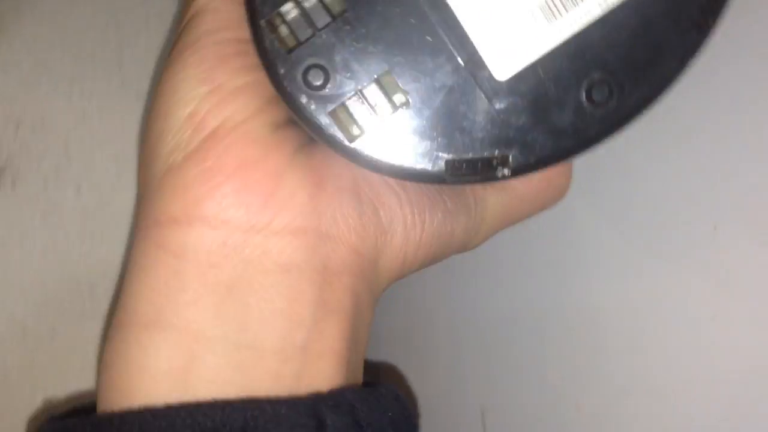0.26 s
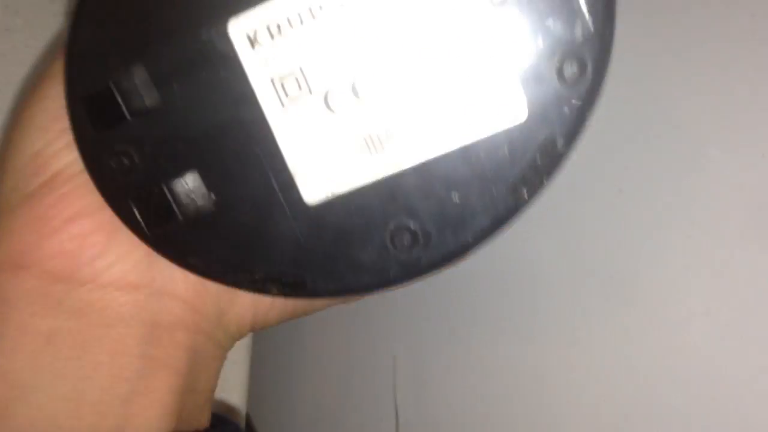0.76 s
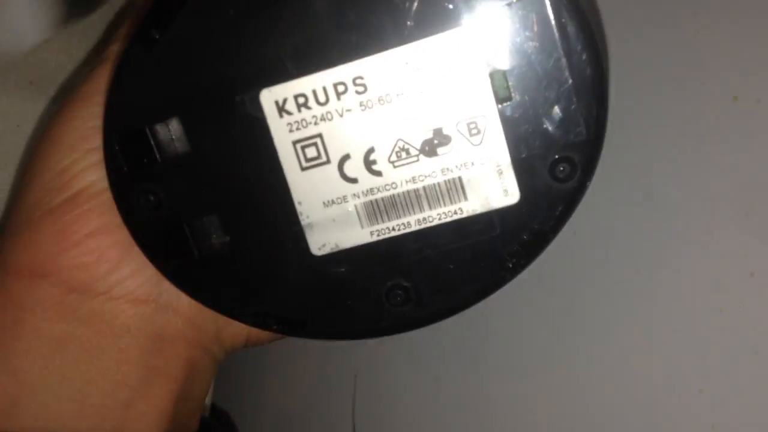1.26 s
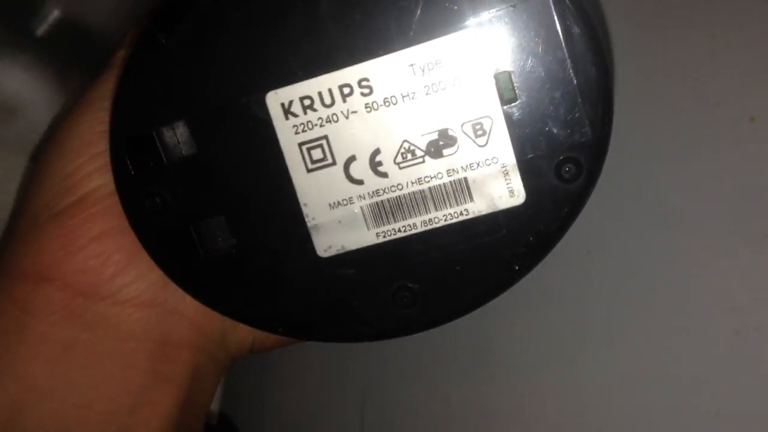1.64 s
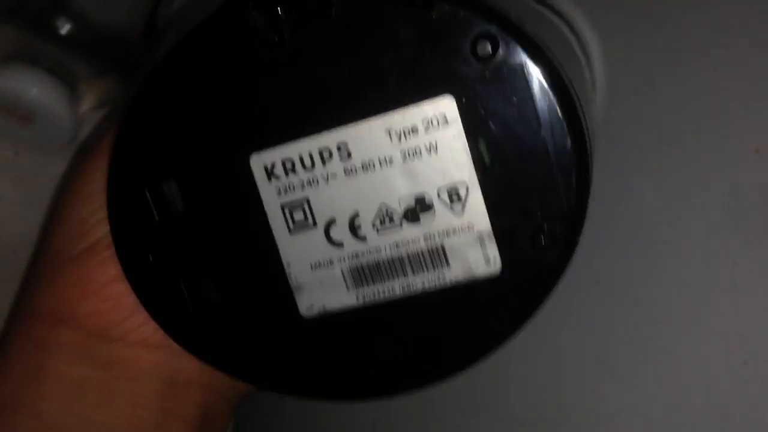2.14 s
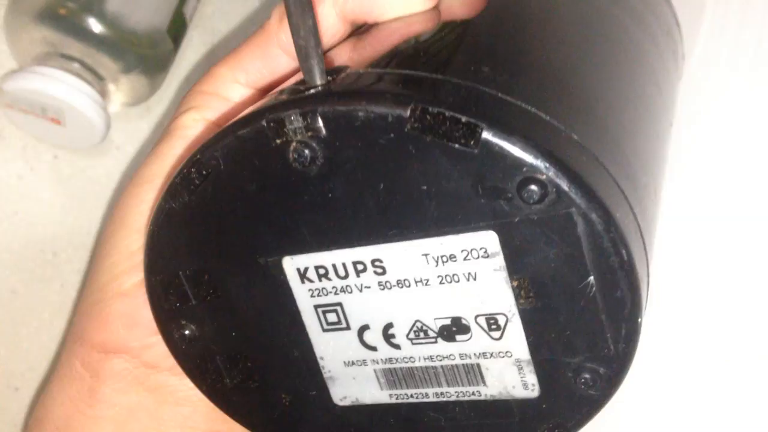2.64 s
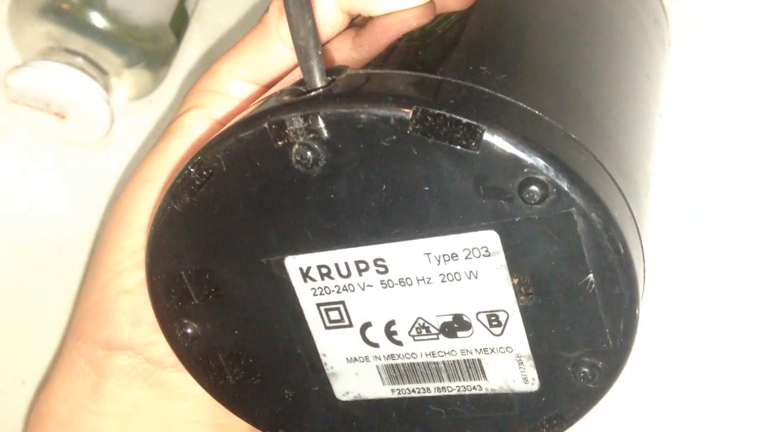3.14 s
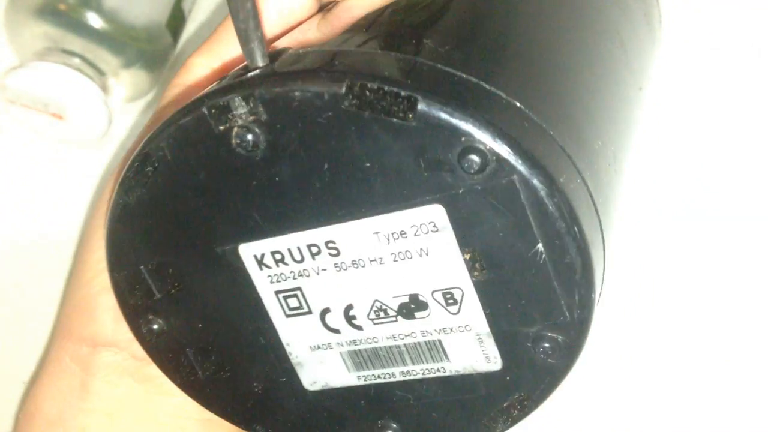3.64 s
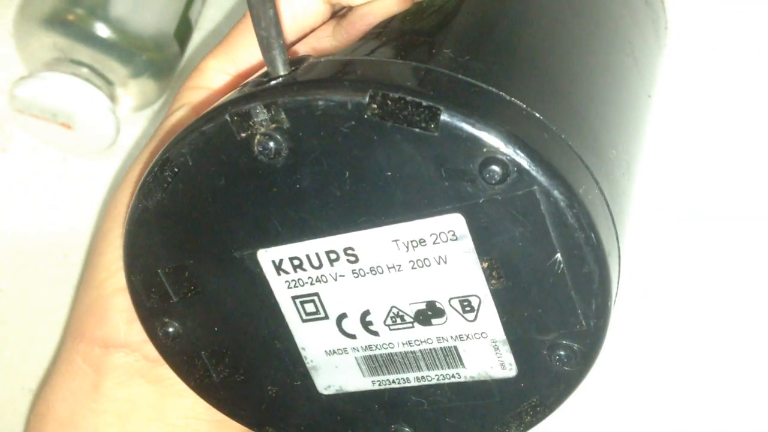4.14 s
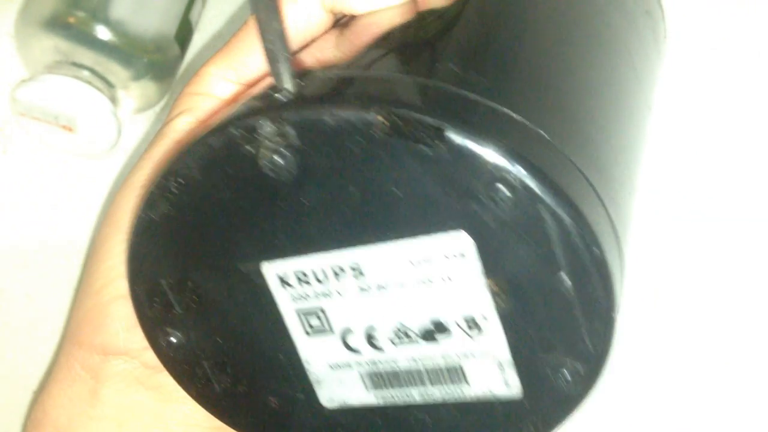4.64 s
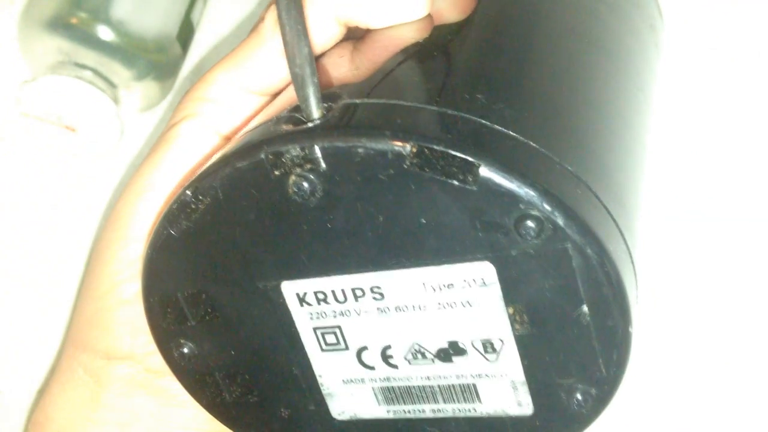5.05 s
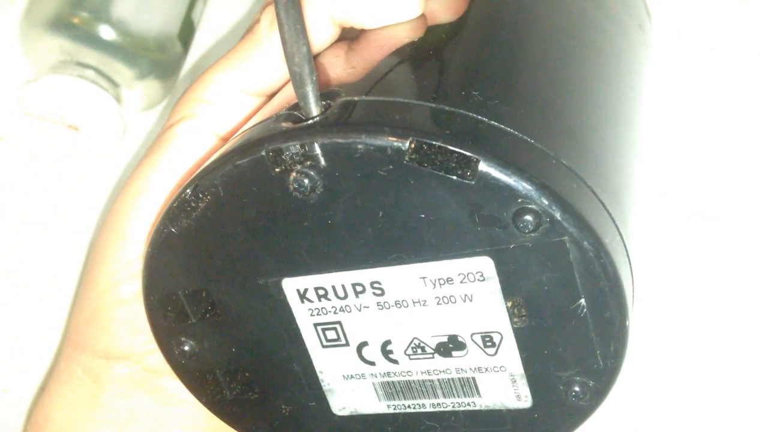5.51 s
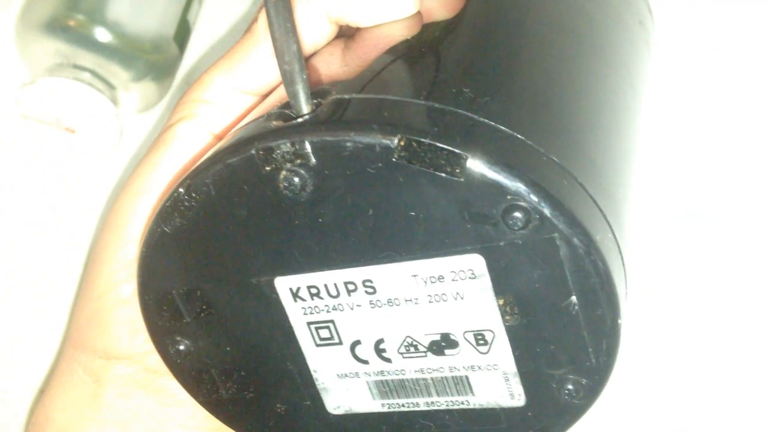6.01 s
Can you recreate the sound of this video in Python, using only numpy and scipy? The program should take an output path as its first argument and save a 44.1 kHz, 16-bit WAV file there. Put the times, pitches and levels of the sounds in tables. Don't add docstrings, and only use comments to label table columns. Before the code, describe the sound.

A quiet kitchen with low hum and soft air, heard very close through one phone microphone. From 0 to 0.4 s, faint finger taps and skin rustle on plastic, then near stillness. The grip tightens around 1.2 s and a loose lid knocks hard on a hollow plastic housing, irregular bright clacks with scuffs and low rumble until 2.2 s; lighter, more muffled chatter follows as it is turned over, ending about 2.55 s. Only room hush until 3.49 s, when a loud double snap of the button starts an empty electric motor. It leaps up in pitch, then climbs slower, a piercing whine with rough whirr, mains pulsing and airy hiss; a small finger click at 4.37 s. Power stops at 4.7 s and the pitch glides steadily down. At 5.13 s the lid springs up with a faint click, the sound thins and buzzes around 5.7 s, still slowing at the end, 6.3 s.

```python
import sys
import numpy as np
from scipy import signal
from scipy.fft import rfft, irfft, next_fast_len
from scipy.io import wavfile
from scipy.ndimage import uniform_filter1d, map_coordinates

SR = 44100
rng = np.random.default_rng(int(sys.argv[2]) if len(sys.argv) > 2 else 0)


def wav_out(sig):
    wavfile.write(sys.argv[1], SR, np.round(np.clip(np.atleast_2d(sig).T, -1, 1) * 32767).astype(np.int16))


def boost(x):
    u = np.asarray(x, float) / 20
    return 10 ** u


N = 276948
T = np.arange(N) / SR

ON_S, OFF_S = 3.484, 4.686
LET_GO_S = 5.135
MAINS_HZ = 100
TOP_HZ = 15400

# centre in Hz, width in Hz, level in dB.
THUMP = [(148.5, 28.6, 0)]
# centre in Hz, width in Hz, level in dB.
HOLLOW = [(332, 57, 1), (540, 70, -3), (795, 114, -5.5)]
# centre in Hz, width in Hz, level in dB.
RING = [(1193, 187, -10), (1349, 167, -8), (1488.6, 27.3, -2), (1786, 112, -14)]
# centre in Hz, width in Hz, level in dB.
SHELL = [(2336, 138, 4), (3130, 85, -2.5), (3390, 140, -9), (4174, 180, -8)]


def unit(x):
    return x / np.sqrt(np.mean(x ** 2) + 1e-20)


def peak(x):
    return x / np.abs(x).max()


def along(points, hz):
    f, v = np.transpose(points)
    return np.interp(np.log(hz + 1), np.log(f + 1), v)


def curve(points, silent=-120):
    s, db = np.transpose(points)
    return np.interp(T, s, db, silent, silent)


def wobble(rate):
    at = np.arange(0, N + 32, 32)
    knots = rng.standard_normal(int(N * rate / SR) + 4)
    return np.interp(np.arange(N), at, map_coordinates(knots, [at * rate / SR]))


def filtered(x, response):
    m = next_fast_len(len(x) + 8192)
    return irfft(rfft(x, m) * response(np.fft.rfftfreq(m, 1 / SR)), m)[:len(x)]


def noise(spectrum):
    return filtered(rng.standard_normal(N), lambda hz: boost(along(spectrum, hz)))


def resonance(hz, centre, width):
    return 1j * hz * width / (centre * centre - hz * hz + 1j * hz * width)


def bump(x, centre, width):
    return 1 / (1 + (2 * (x - centre) / width) ** 2)


def modes(table, scatter_db=0):
    gains = boost(np.transpose(table)[2] + scatter_db * rng.standard_normal(len(table)))

    def response(hz):
        total = 0
        for k, ((centre, width, _), gain) in enumerate(zip(table, gains)):
            total = total + (-1) ** k * gain * resonance(hz, centre, width)
        return total
    return response


def hush():
    # Hz, level in dB per Hz.
    room_spectrum = [(12, -63), (20, -17.5), (78, -10.5), (106, -0.5), (140, 0.5), (342, -14), (439, -17.5),
                     (478, -18), (705, -23), (1230, -23.5), (1540, -22.5), (2270, -25), (2610, -33),
                     (14300, -40.5), (15500, -42.5)]
    # time in seconds, level in dB.
    room_level = [
        (0.0, -51),
        (6.28, -55),
    ]
    return boost(curve(room_level, silent=None) + wobble(4.1)) * unit(noise(room_spectrum))


def kitchen_echo(x):
    # Hz, decay by 60 dB in seconds.
    walls = [(150, .3), (2000, 0.19), (10000, 0.16)]
    hz, t, z = signal.stft(rng.standard_normal(SR // 2), SR, nperseg=256)
    decay = boost(-60 * t / along(walls, hz)[:, None])
    tail = signal.istft(z * decay, SR, nperseg=256)[1]
    late = np.pad(x, (200, 0))
    return signal.fftconvolve(late, tail / np.linalg.norm(tail))[:N]


def shaking():
    # time in seconds, effort of the shake in dB.
    effort = [
        (1.1, -75),
        (1.238, -57),
        (1.298, -37),
        (1.43, -47),
        (1.75, -41),
        (2.05, -41),
        (2.244, -45),
        (2.37, -35.5),
        (2.5, -54),
        (2.65, -74),
    ]
    # time in seconds, level in dB.
    rustle = [
        (0.0, -52.5),
        (0.06, -49),
        (0.3, -68.5),
        (0.92, -59),
        (1.1, -63),
        (1.2, -51.5),
        (1.245, -49),
    ]
    effort_db = curve(effort)
    scuff_db = 1.3 * (effort_db + 42.5) - 41

    slips = boost(4.5 * wobble(90)) * rng.standard_normal(N)
    scuff = 1.2 * unit(filtered(slips, modes(np.array(RING) * [1, 2.5, 1])))
    scuff += 0.35 * unit(filtered(slips, modes(SHELL)))
    scuff += 0.8 * unit(filtered(slips, modes(HOLLOW)))
    scuff = unit(scuff + 0.025 * slips)

    rumble = unit(boost(3.2 * wobble(30.1)) * filtered(rng.standard_normal(N), modes(THUMP)))
    skin_spectrum = [(150, -21), (350, 12.0), (1500, -6), (5000, -13), (14000, -21)]  # (Hz, dB)
    skin = unit(boost(3.9 * wobble(35)) * noise(skin_spectrum))
    return boost(effort_db - 0.3) * rumble + boost(scuff_db - 1.5) * scuff + boost(curve(rustle) - 2.0) * skin


def button():
    # start in seconds, peak in dB, low push in dB, length
    # in seconds.
    clicks = [
        (0.029, -43, 9, 0.015),
        (0.064, -41, 8, 0.0055),
        (0.2, -38.5, 4.5, 0.0088),
        (0.409, -42, -9, .005),
        (3.487, -12.5, -7.5, 0.0075),
        (3.494, -14.5, 3, 0.014),
        (3.513, -19.5, -14.5, 0.0043),
        (4.27, -35, -29, 0.013),
        (4.365, -27, -5.5, .015),
              (5.126, -30, 5, .012),
    ]
    out, t = np.zeros(N + SR), np.arange(SR // 10) / SR
    for s, db, low_db, length in clicks:
        burst = boost(-25 * t / length) * rng.standard_normal(len(t))
        snap = filtered(burst, modes([(1880, 2700, 5.0), (4670, 3000, -0.5), (9000, 13000, -12.0)]))
        push = filtered(burst, modes([(316, 270, 9.5), (650, 1300, 2)]))
        out[round(s * SR):][:len(t)] += boost(db) * (peak(snap) + boost(low_db) * peak(push))
    return out[:N]


def blow(t, t60):
    burst = boost(-60 * t / t60) * rng.standard_normal(len(t))
    burst[:2] = 1.66
    late = rng.integers(130, 300)
    burst[late:] += rng.uniform(0.13, 0.64) * burst[:-late]
    return burst


def knock(t, db, flat_db, ring_db, damping):
    # Hz, level in dB.
    crack_spectrum = [(3000, 0), (5600, 3.5), (8800, -1), (12000, -9), (15500, -30)]
    thump_db = -0.5 + 1.05 * flat_db
    hollow_db = 1.54 + 0.86 * flat_db
    crack_db = 0.6 + 0.96 * flat_db + 0.28 * (db + 14.5)

    thump = peak(filtered(blow(t, 0.016), lambda hz: modes(THUMP)(hz) / (1 + 1j * hz / 300)))
    hollow = peak(filtered(blow(t, 0.016), modes(HOLLOW, scatter_db=1.5)))
    cup = modes(np.array(RING) * [1, damping, 1], scatter_db=0.5)
    ring = peak(filtered(blow(t, 0.011), lambda hz: cup(hz) * (1j * hz / (1100 + 1j * hz)) ** 2))
    shell = peak(filtered(blow(t, 0.0078), modes(SHELL, scatter_db=1.6)))
    settle = blow(t, 0.017) + boost(-17.5 + 0.4 * flat_db) * blow(t, 0.07)
    crack = peak(filtered(settle, lambda hz: boost(along(crack_spectrum, hz)) * (hz > 2900)))

    body = shell + boost(thump_db + 8.0) * thump + boost(hollow_db + 6.5) * hollow
    return boost(db) * (body + boost(ring_db + 5.5) * ring + boost(crack_db + 7.5) * crack)


def lid():
    # start in seconds, peak in dB, flatness in dB, ring in dB.
    knocks = [(1.2181, -51, 8, -3.5), (1.2479, -25, -3, -4), (1.3041, -6.5, -14.5, -4),
              (1.4122, -15.5, -9, 7), (1.502, -11.5, -18, -3), (1.5417, -23, -0.5, 7),
              (1.576, -9.5, -20, -6), (1.6513, -12.5, -16.5, -3), (1.719, -14, -15.5, -7.5),
              (1.7444, -22, 0, 4), (1.7707, -11.5, -22, -7.5), (1.8252, -12.5, -21, -4),
              (1.8716, -16.5, -17.5, -7), (1.9163, -15, -10, -5), (1.99, -8, -21.5, -11.5),
              (2.0515, -14, -11.5, -4.5), (2.094, -18.5, -20, -8), (2.1261, -19.5, -17, -11),
              (2.154, -26, -14.5, -6), (2.171, -25, -4, -1), (2.2174, -13.5, -20.5, -4)]
    # start in seconds, peak in dB, flatness in dB.
    chatter = [(2.2576, -28, -4.5), (2.2699, -19, -20.5), (2.293, -24.5, -15), (2.316, -26.5, -14),
               (2.3283, -27.5, -7.5), (2.3612, -17, -22), (2.379, -30, -16), (2.397, -18.5, -21),
               (2.416, -34.5, -8), (2.4571, -20.5, -16.5), (2.483, -30.5, -10), (2.504, -33.5, -8.5),
               (2.5481, -56, 4)]
    # time in seconds, factor on the ring widths.
    grip = [
        (1.2, 1.27),
        (2.0, 1.3),
        (2.3, 1.75),
    ]
    out, t = np.zeros(N + SR), np.arange(SR // 6) / SR
    ringing_chatter = [(s, db, flat_db, -1.8 + 0.34 * flat_db) for s, db, flat_db in chatter]
    for s, db, flat_db, ring_db in knocks + ringing_chatter:
        start = round(s * SR)
        damping = np.interp(s, *np.transpose(grip))
        out[start:][:len(t)] += knock(t, db, flat_db, ring_db, damping)
        swell = boost(-60 * t[::-1] / 0.022) * rng.standard_normal(len(t))
        out[start - len(t):start] += boost(db - 13) * peak(filtered(swell, modes(SHELL)))
    return filtered(out[:N], lambda hz: 1 - resonance(hz, 2760, 220))


def rotor():
    top_speed = 502.06
    friction, drag = 202.8, 0.295
    powered = np.clip(T - ON_S, 0, OFF_S - ON_S)
    up = top_speed - 191.2 * np.exp(-powered / 0.47) - 186.6 * np.exp(-powered / 0.123)
    return (up + friction / drag) * np.exp(-drag * np.maximum(T - OFF_S, 0)) - friction / drag


def level_law(row, speed, live, free):
    db, slope_db, coast_db, free_db = row
    return db + slope_db * np.log2(speed / 480) + coast_db * (1 - live) + free_db * free


def tone(k, turn, step=0):
    return np.sqrt(2) * np.sin(k * turn + step * 2 * np.pi * MAINS_HZ * T + rng.uniform(0, 2 * np.pi))


def order_gains(speed, live, free):
    multiples = (1, 2, 3, 4, 5, 6, 7, 8, 10, 16)
    # dB at full speed, dB per octave of speed, coasting dB,
    # lid let go dB, flutter in dB.
    order_levels = [(-28, 8.5, 0.7, -6, -0.37), (-50, 3, -2.5, -3, 2.5), (-40, 8.5, -2.5, -9, 2),
                    (-37.5, 16.5, 6, -17, 2.5), (-42.5, 13, -2, -0.5, 4.5), (-44, 16, 0, -4, 5.5),
                    (-49.5, 16.5, 1.5, 4, 5.5), (-35, 10, -6.5, 1, 1), (-47.5, 3, -6, -4, 4.5),
                    (-49.5, -1.5, -4, -3.5, 2)]
    # centre in Hz, width in Hz, lift in dB.
    way_out = [(258, 58, -14.5), (428.3, 20, -4.5), (454, 25, 1), (694, 36, 10), (850, 29, -4),
               (1070, 70, 5.5), (1510, 61, 4), (1971, 100, 11), (2262, 86, 5.5), (3030, 230, -15.5),
               (3126, 72, 13), (3627, 240, 6), (4580, 280, 10.5), (7132, 540, 11.5)]
    sink_db = 13 * np.minimum(np.log2(speed / 212), 0)
    looseness = 1.83 + (1 - 1.83) * live
    coarse = slice(None, None, 64)
    gain = {}
    for k, (*row, flutter_db) in zip(multiples, order_levels):
        lift_db = sum(db * bump(k * speed[coarse], c, w) for c, w, db in way_out)
        flutter = flutter_db * looseness * (0.94 - wobble(16) ** 2)
        level_db = level_law(row, speed, live, free) + np.interp(T, T[coarse], lift_db)
        gain[k] = boost(level_db + sink_db + flutter)
    gain[1] = gain[1] * boost(3.7 * live * np.clip((speed - 410) / 30, 0, 1))
    return gain


def shaft_tones(gain, turn):
    # multiple of the turn, level in dB.
    whirl_orders = [(.73, 0), (2.72, -5.5), (3.28, 2), (5.72, 1)]
    whirl = (T > 4.265) * np.exp(-np.maximum(T - OFF_S, 0) / 0.078)
    orders = 0
    for k in gain:
        if k != 8:
            orders = orders + gain[k] * boost(-9 * whirl * (k in (3, 5))) * tone(k, turn)
    orders = orders * boost(-10 * np.exp(-((T - ON_S) / 0.17) ** 2))
    precession = sum(boost(db + 2.5 * wobble(12)) * tone(k, turn) for k, db in whirl_orders)
    return orders + boost(-48.5) * whirl * precession


def magnetic_tones(slot_gain, turn, speed, live):
    # multiple of the turn, mains steps, level in dB.
    beat_lines = [(2, -1, -41), (2, 1, -39.5), (3, -1, -39), (4, 0.94, -45.5), (7, 0.93, -28),
                  (9, 0.93, -30), (10, -1.2, -38), (10, 1, -37.5)]
    since = np.maximum(T - 3.55, 0) / 0.091
    torque = np.minimum(10 * since, 1) * boost(11.5 * since * np.exp(1 - since))
    depth = (0.56 + 0.5 * np.exp(-since / 2.5)) * live
    slot_lines = [(-1.5, -11.5), (1.8, -1.5), (2.0, -28), (5, -27)]  # (mains steps, dB)
    ripple = sum(boost(db + 0.88 * wobble(4.2)) * tone(8, turn, step) for step, db in slot_lines)
    pulsing = tone(8, turn) * (1 + depth * np.cos(2 * np.pi * MAINS_HZ * T))
    slots = slot_gain * torque * (pulsing + 0.45 * live * ripple)
    beats = sum(boost(db + 1.7 * wobble(5.32)) * tone(k, turn, step) for k, step, db in beat_lines)
    return slots + live * np.minimum(since, 1) * boost(-14.5) * (speed / 480) ** 0.78 * beats


def commutator(turn, speed, drift):
    order = np.arange(161)
    rows = np.arange(int(N * drift / SR) + 1)
    audible = order * speed[(rows * SR / drift).astype(int), None] < TOP_HZ
    unclaimed = (order > 6) & ~np.isin(order, (7, 8, 10, 16))
    phase = rng.uniform(0, 2 * np.pi, len(order))
    size = unclaimed * audible * boost(3.3 * rng.standard_normal(audible.shape))
    tracks = irfft(size * np.exp(1j * phase), 1024, axis=1)
    tracks /= tracks.std(axis=1, keepdims=True)
    place = (turn / (2 * np.pi) * tracks.shape[1] + 0.27 * wobble(150)) % tracks.shape[1]
    return map_coordinates(tracks, [np.arange(N) * drift / SR, place], mode="grid-wrap")


def casing(hz, ripple_db):
    # centre in Hz, width in Hz, lift in dB.
    resonances = [(720, 46, -1), (1983, 220, 6.5), (2810, 55, -35), (3570, 150, 7), (4390, 136, 3),
                  (4820, 440, 1), (6970, 610, -1.5), (10450, 950, 3)]
    fine = map_coordinates(rng.standard_normal(200), [hz / 115])
    lift_db = sum(db * bump(hz, c, w) for c, w, db in resonances)
    return boost(ripple_db * fine / (1 + (hz / 7000) ** 4) + lift_db)


def brushes_and_air(turn, speed, live, free):
    # Hz, level in dB per Hz.
    body_pressed = [(120, -57), (200, -31), (408, 0), (440, -1.5), (592, -15.5), (954, -14.5), (1980, 3),
                    (2290, 0.5), (2910, 0.5), (3580, -3.5), (7000, -11), (9100, -36), (15400, -120)]
    # Hz, level in dB per Hz.
    body_free = [(240, -24), (400, -3.5), (546, -20), (677, -5), (1040, -16), (1220, -8), (1550, -13),
                 (2010, -3.5), (2780, -8), (3580, -7), (7000, -11), (9100, -22), (15400, -120)]
    # Hz, level in dB per Hz.
    air_pressed = [(2650, -27.5), (4500, -6), (5720, -5.5), (7130, -3.5), (8710, -6.5), (10300, -8.5),
                   (14200, -15), (15300, -16.5)]
    # Hz, level in dB per Hz.
    air_free = [(2650, -44), (4500, -6.5), (5360, 0.5), (6000, -10), (7170, -4), (8620, -11.5), (11000, -4),
                (12800, -12), (13800, -12), (15300, -18.5)]
    mains = 2 * np.pi * MAINS_HZ * T
    gate = boost(3.2 * np.cos(turn) + 1.3 * live * np.cos(mains) + 0.79 * wobble(40))
    comb = boost(np.where(T < OFF_S, -9, -1.5)) * commutator(turn, speed, drift=16)
    comb = comb * np.clip(speed / 200, 0, 1) * np.sqrt(300 / np.maximum(speed, 300))
    rub = filtered(gate * rng.standard_normal(N), lambda hz: casing(hz, ripple_db=4.0))
    rub += filtered(comb, lambda hz: casing(hz, ripple_db=4.5))

    def shaped(spectrum):
        x = unit(filtered(rub, lambda hz: boost(along(spectrum, hz))))
        return x / np.sqrt(np.abs(uniform_filter1d(x ** 2, 4000)) + 1e-9)

    whirr = (1 - free) * shaped(body_pressed) + free * shaped(body_free)
    hiss = (1 - free) * shaped(air_pressed) + free * shaped(air_free)
    inrush = np.exp(-np.abs(T - ON_S) / 0.021)
    whirr_db = level_law((-27, 6, -2.5, -3.5), speed, live, free) + 14 * inrush
    hiss_db = level_law((-30, 9, -3.5, -2.5), speed, live, free) + 2 * inrush
    swell_db = free * 4.3 * bump(speed, 226, 64)
    return whirr * boost(whirr_db + swell_db - 3.5) + hiss * boost(hiss_db + 0.6 * swell_db + 1.5)


def motor():
    speed, on = rotor(), T > ON_S
    turn = 2 * np.pi * np.cumsum(speed * (1 + 0.001158 * wobble(60))) / SR
    live = np.clip((OFF_S + 0.014 - T) / 0.022, 0, 1) * on
    free = np.clip((T - LET_GO_S) / 0.01496, 0, 1)
    gain = order_gains(speed, live, free)
    tones = shaft_tones(gain, turn) + magnetic_tones(gain[8], turn, speed, live)
    return on * (tones + brushes_and_air(turn, speed, live, free))


def scene():
    hits, whine = lid() + button(), motor()
    echo = boost(-12.5) * kitchen_echo(hits) + boost(-12.0) * kitchen_echo(whine)
    mono = hits + whine + echo + shaking() + hush()
    return np.array([mono, mono])


def roll_off(x):
    return signal.sosfilt(signal.butter(12, 16480, fs=SR, output="sos"), x)


def record(dry):
    # middle in seconds, centre in Hz,
    # level in dB.
    puffs = [
        (5.03, 10400, -55),
        (5.055, 5160, -41),
        (5.08, 10500, -56),
        (5.145, 9000, -49),
        (5.188, 10200, -55),
        (5.24, 5200, -55),
        (5.24, 7600, -56),
        (6.12, 5900, -65),
    ]
    mono = dry[0] / (1 + np.abs(dry[0] / 0.8) ** 4) ** (1 / 4)
    mono = filtered(mono, lambda hz: (1j * hz / (35 + 1j * hz)) ** 2 * (hz < TOP_HZ))
    side, fade = np.zeros(N), np.hanning(2048)
    wide = 1.22
    for s, mid_hz, db in puffs:
        hissing = rng.standard_normal(len(fade))
        band = filtered(hissing, lambda hz: (hz > mid_hz / wide) & (hz < mid_hz * wide))
        side[round(s * SR) - len(fade) // 2:][:len(fade)] += boost(db + 9) * unit(band) * fade
    return roll_off(np.array([mono + side, mono - side]))


dry = scene()
out = record(dry)
wav_out(out)
```